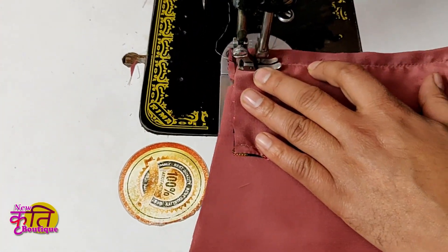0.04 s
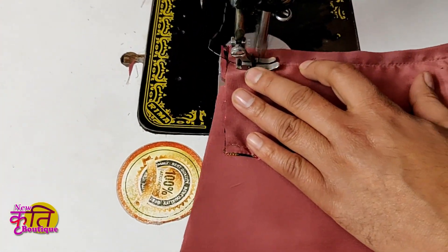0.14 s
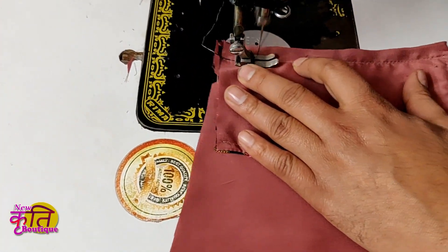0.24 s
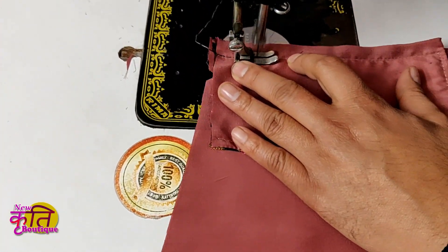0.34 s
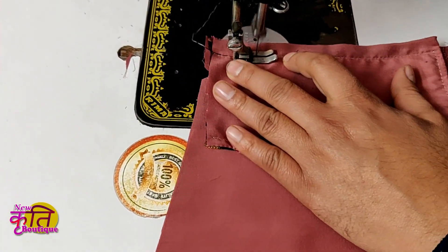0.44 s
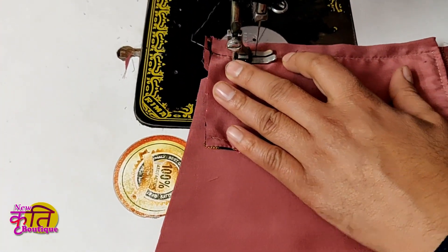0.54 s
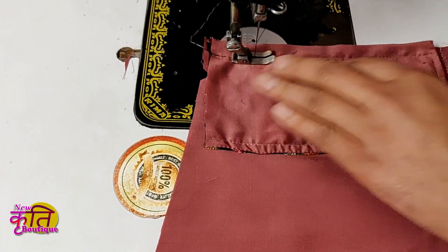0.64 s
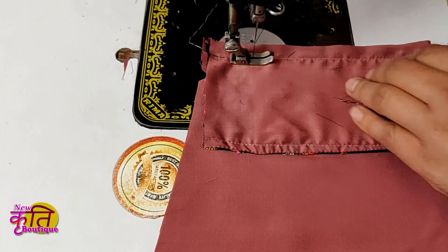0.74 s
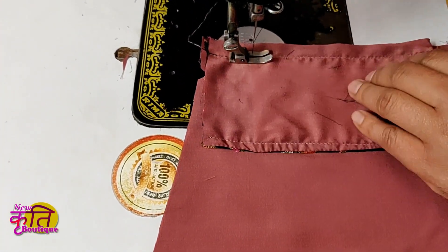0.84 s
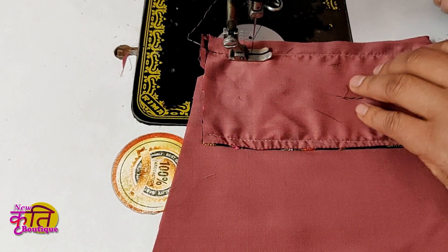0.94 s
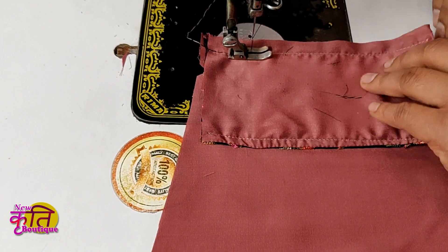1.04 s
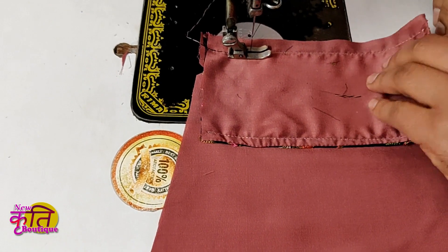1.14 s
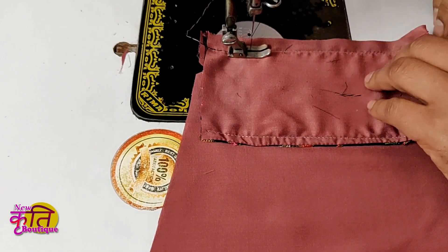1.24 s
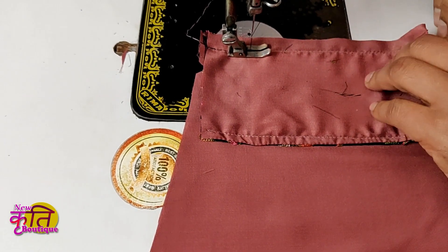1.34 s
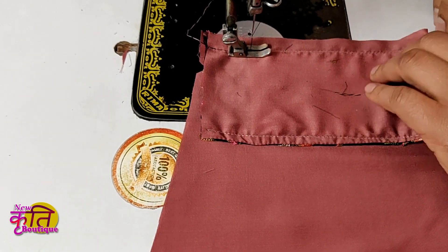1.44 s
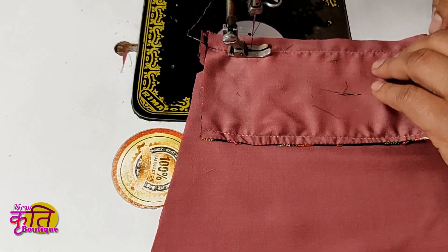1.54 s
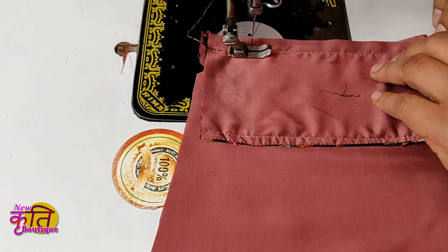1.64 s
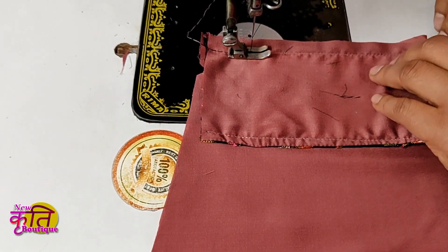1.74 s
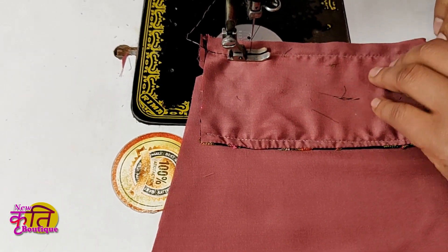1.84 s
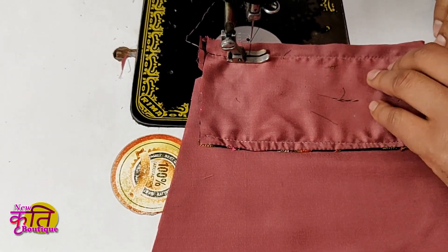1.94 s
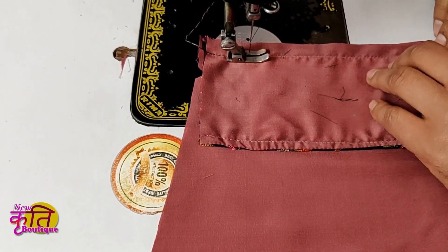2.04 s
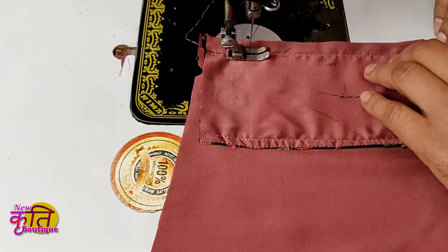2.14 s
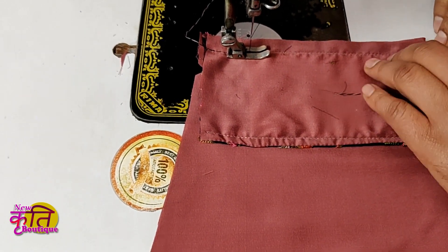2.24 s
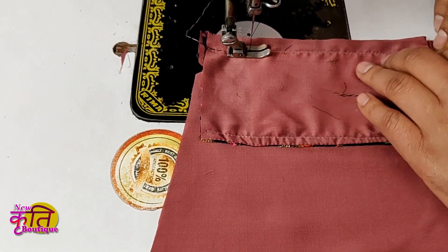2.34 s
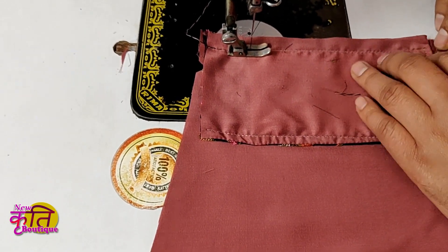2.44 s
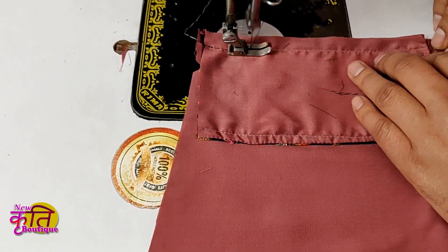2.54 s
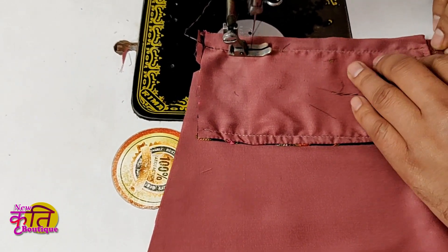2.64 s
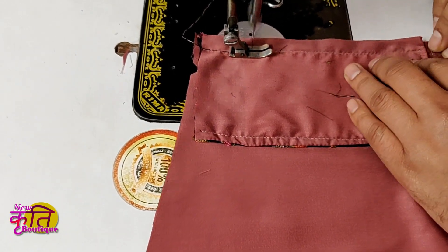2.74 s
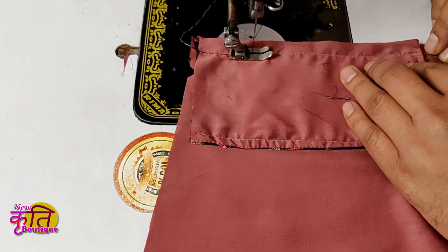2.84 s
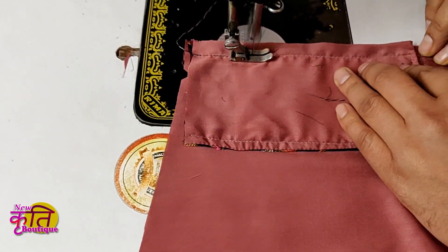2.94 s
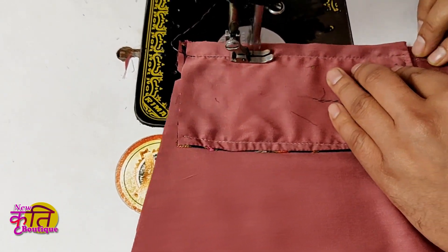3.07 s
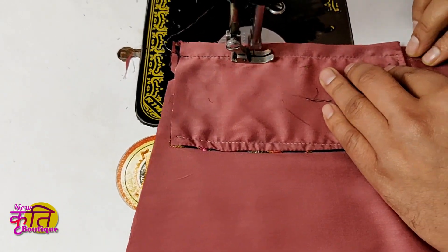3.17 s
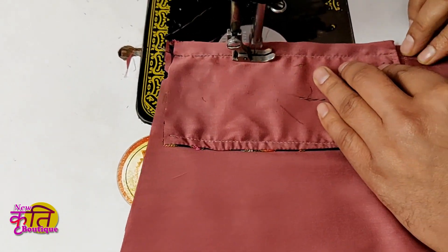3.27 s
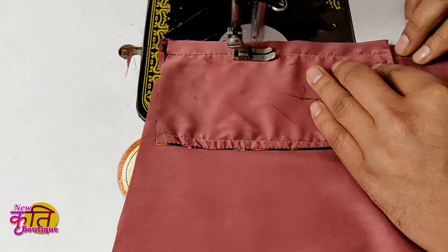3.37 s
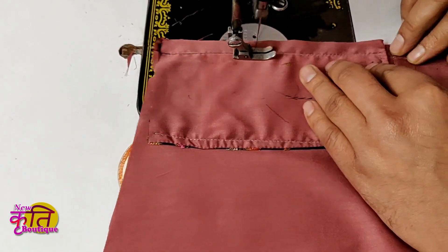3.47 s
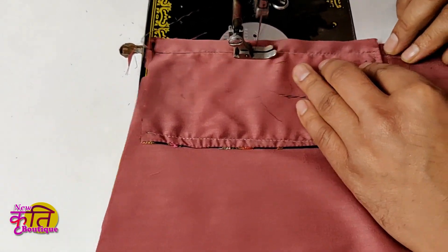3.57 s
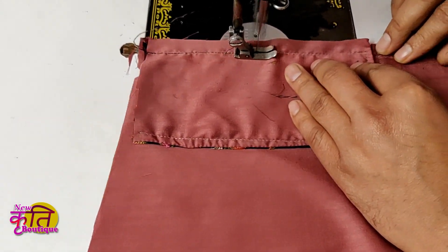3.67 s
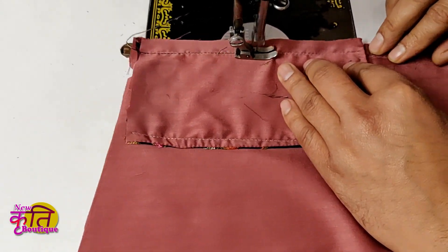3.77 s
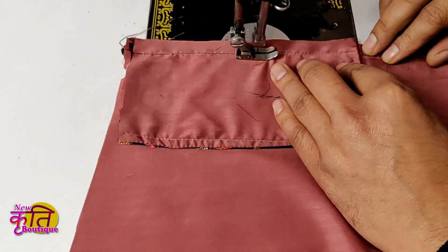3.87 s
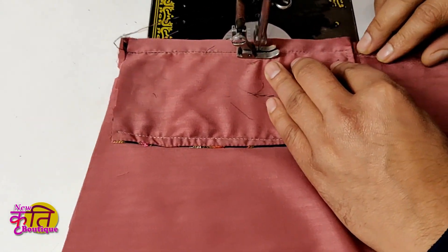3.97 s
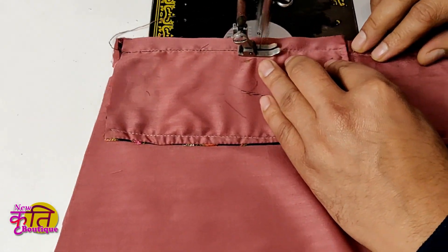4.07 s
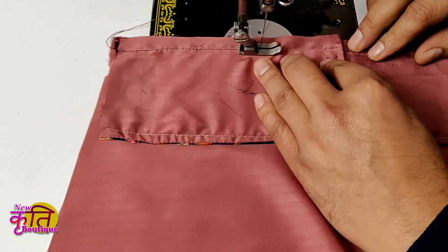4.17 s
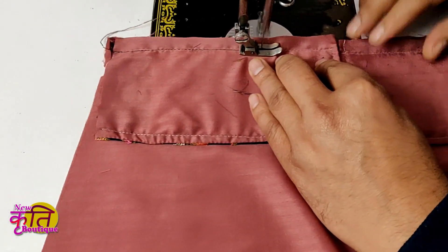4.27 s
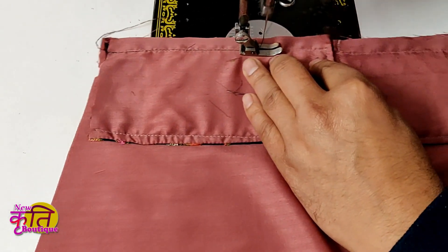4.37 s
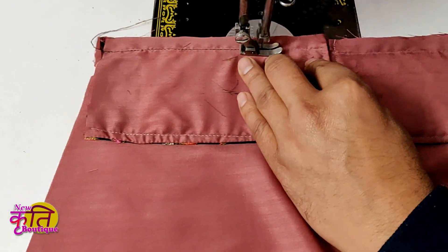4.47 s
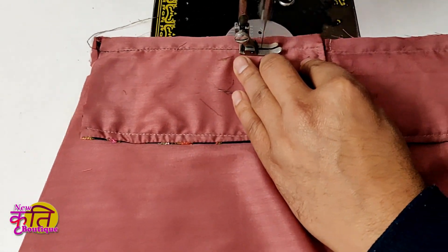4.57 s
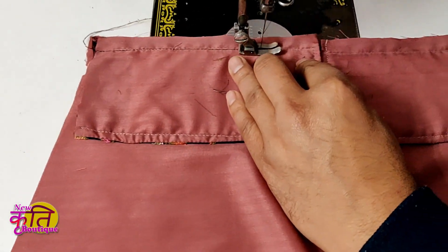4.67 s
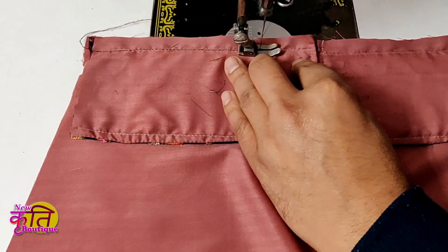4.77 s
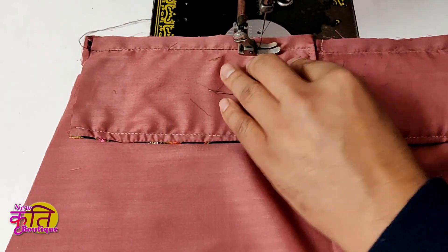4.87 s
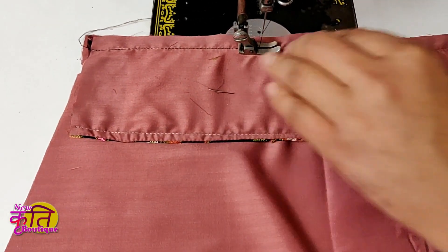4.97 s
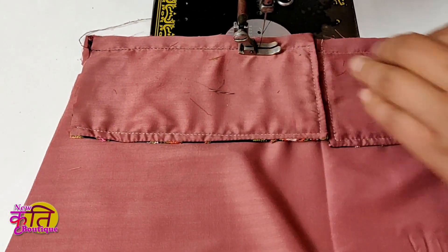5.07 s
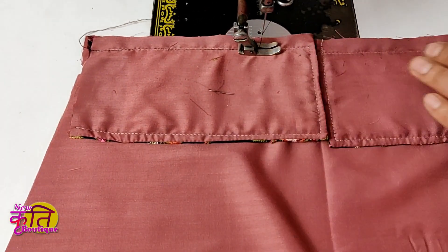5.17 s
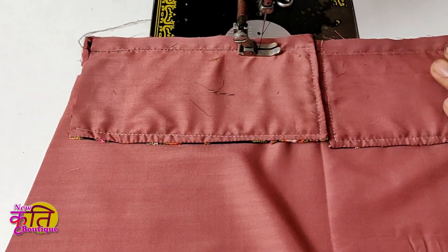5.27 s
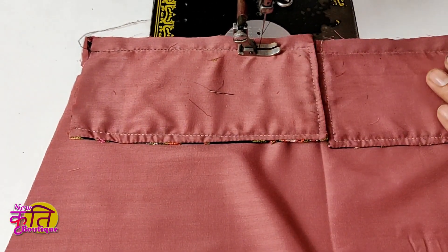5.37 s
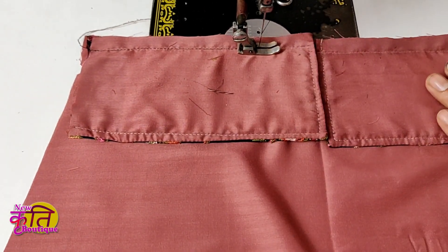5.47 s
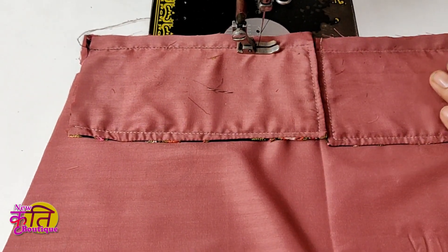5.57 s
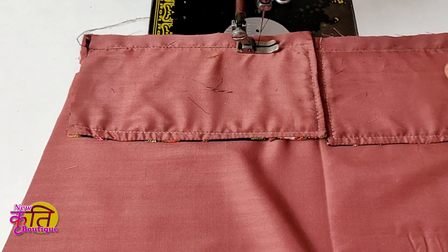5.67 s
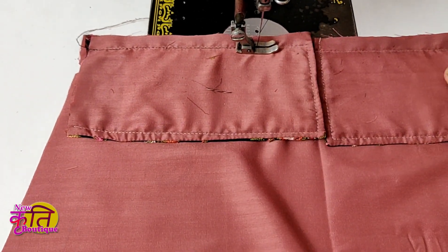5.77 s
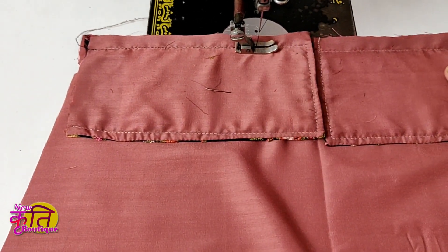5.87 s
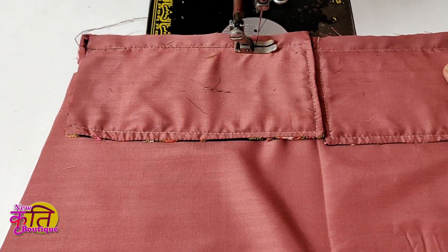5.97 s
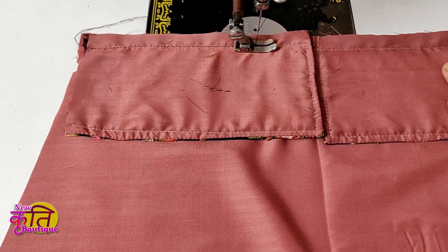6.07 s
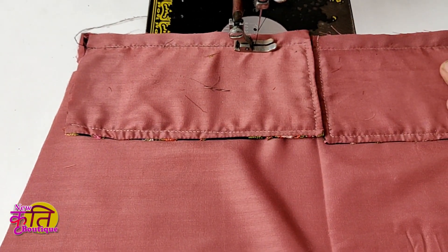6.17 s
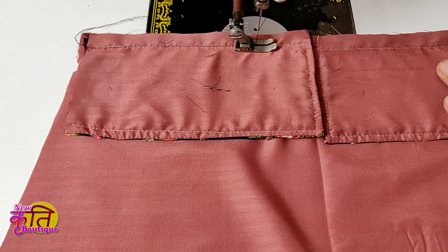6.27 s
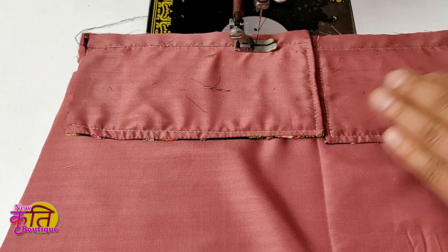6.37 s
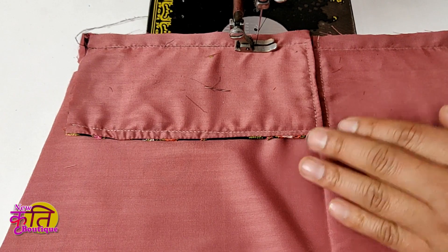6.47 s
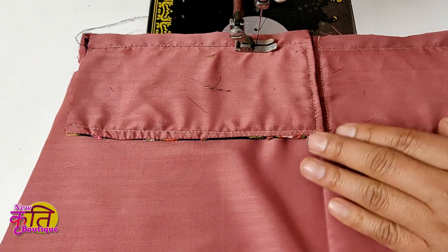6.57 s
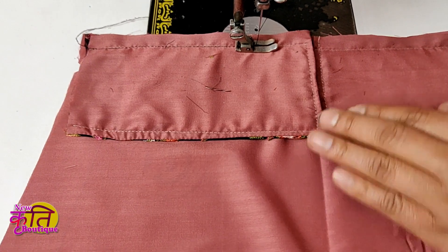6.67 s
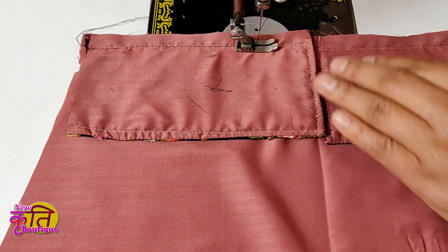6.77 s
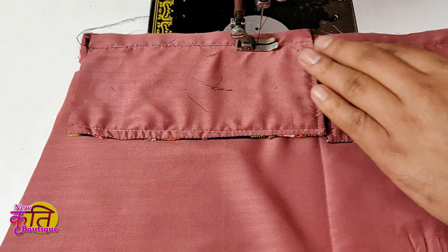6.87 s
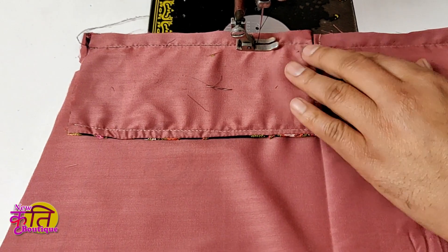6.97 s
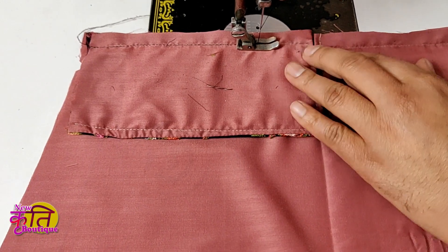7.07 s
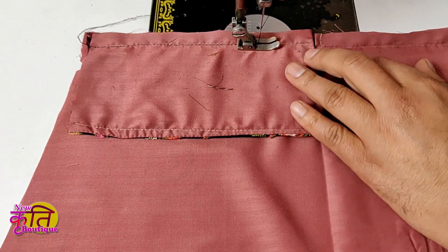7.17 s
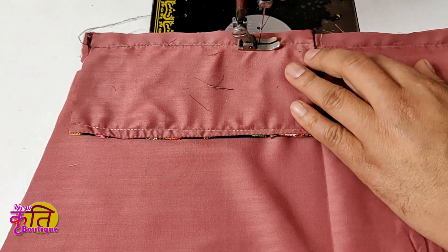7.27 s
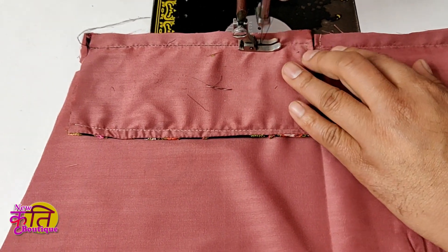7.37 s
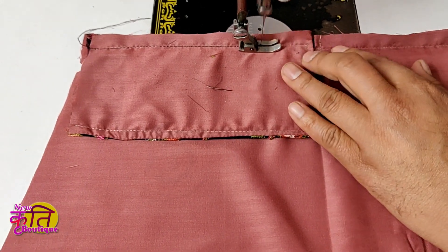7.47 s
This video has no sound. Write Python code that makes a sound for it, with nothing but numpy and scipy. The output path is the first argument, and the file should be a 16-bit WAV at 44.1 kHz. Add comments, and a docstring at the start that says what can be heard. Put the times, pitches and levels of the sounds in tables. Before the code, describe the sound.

Close up, a motor-driven sewing machine stitches cloth in three clattering bursts, its belt squealing on restarts, over a faint hum.

```python
"""A room with a throbbing hum, close to a table: a cast-iron sewing machine sews a seam in three short runs.
Each shaft turn knocks the table, rattles the linkage and drives the needle through the cloth. On the later two
starts the loaded motor buzzes and a high squeal rises. Under strain the machine groans, dry joints chirp and
steel parts clink."""
import sys
import numpy as np
from scipy import signal
from scipy.fft import rfft, irfft, next_fast_len
from scipy.io import wavfile
from scipy.ndimage import uniform_filter1d, minimum_filter1d, map_coordinates

SR = 44100
rng = np.random.default_rng(int(sys.argv[2]) if len(sys.argv) > 2 else 0)


def unload_wav(signal):
    """Save mono or channel-first audio to the path in sys.argv[1] as 16-bit WAV at rate SR, clipped to [-1, 1]."""
    wavfile.write(
        sys.argv[1],
        SR,
        np.round(np.clip(np.atleast_2d(signal).T, -1, 1) * 32767).astype(np.int16),
    )


N = 331191
T = np.arange(N) / SR

# Diffuse sound field. Each row: frequency in Hz, left-right correlation.
COHERENCE = [(100, 0.89), (300, 0.79), (600, 0.56), (1200, -0.36), (3000, 0.066), (6000, -0.25),
             (15000, 0.049)]
# Low hum lines. Each row: frequency in Hz, relative level in dB.
HUM_LOW = [(43.1, -24), (86, -27), (94, -15.5), (111, -7), (128, -6), (145, -1.5), (157, -2), (174, -10)]
# Envelope of the low hum. Each row: time in seconds, level in dB.
HUM_LOW_ENVELOPE = [(.5, -35.5), (1.0, -37.5), (1.6, -41.5), (1.9, -38.5), (2.2, -42), (4.9, -45.5),
                    (5.4, -46), (6.2, -44), (6.7, -49), (7.1, -50)]
# Upper hum lines. Each row: frequency in Hz, level in dB.
HUM_HIGH = [(201, -51), (210.4, -43.5), (224, -47), (236, -54), (274, -64)]
# Room noise. Each row: frequency in Hz, relative density in dB.
AIR_SPECTRUM = [(25, -12), (60, -15.5), (100, 6), (185, 4), (255, 7.5), (290, 3.5), (350, -7.5), (500, -14),
                (750, -11), (1050, -18), (1600, -23), (3000, -31), (7000, -35), (16000, -41.5)]
# Envelope of the room noise. Each row: time in seconds, level in dB.
AIR_ENVELOPE = [(.5, -41.5), (1.2, -45), (2.2, -45), (5.0, -46.5), (5.7, -48.5), (7.1, -47)]
# Room resonances. Each row: frequency in Hz, bandwidth in Hz, relative gain in dB.
AIR_MODES = [(370, 14, -3), (645, 18, -7), (900, 19, 2), (1053, 14, -9), (1173, 30, -7), (1320, 20, -7)]

# Cloth shifted by hand. Each row: centre in seconds, half length in seconds, gain in dB.
RUSTLES = [(1.02, 0.083, -67), (1.782, 0.092, -67), (2.046, 0.043, -62), (2.284, 0.032, -50),
           (5.064, 0.055, -63), (5.3, 0.2, -67), (6.045, 0.043, -64), (7.114, 0.1, -60)]
# Faint creaks. Each row: start and length in seconds, first and last pitch in Hz, level in dB.
CREAKS = [(1.92, 0.27, 1350, 1330, -65), (6.58, 0.11, 690, 720, -58), (6.79, 0.13, 1260, 1310, -63),
          (6.82, 0.15, 846, 820, -55.5), (6.93, 0.094, 496, 490, -47.5)]
# Metal clicks in the pauses. Each row: time in seconds, gain in dB, relative ring gain in dB.
CLICKS = [(.823, -49.5, -10), (5.438, -46, -3.5)]
# Snap of a click. Each row: frequency in Hz, relative density in dB.
CLICK_SPECTRUM = [(300, -45), (800, 12.5), (1500, -3), (2600, 2), (4000, -6.5), (7000, -5), (8800, -13),
                  (10000, -23), (15000, -25)]
# Ring of a click. Each row: frequency in Hz, relative level in dB, T60 in seconds.
CLICK_MODES = [(790, 4, 0.5), (836, 7.5, 0.4), (1141, -3, 0.55), (1260, -2, .2), (2120, 0, 0.21),
               (2918, -8, .19), (6740, -2, .15)]

# Squeals on starting. Each row: start and length in seconds, first and last pitch in Hz, gain in dB.
SQUEALS = [(2.36, 0.11, 995, 985, -33), (2.485, .135, 2660, 3110, -36.5), (7.3, .17, 2580, 3120, -36.5),
           (7.435, .055, 1005, 975, -31)]
# Motor under starting load. Each row: start and end in seconds, gain in dB.
MOTOR_LOADS = [(2.33, 2.899, -30), (7.164, 7.5, -33)]
# Motor buzz. Each row: multiple of the mains frequency, relative level in dB.
MAINS_ORDERS = [(2, -2.5), (3, -0.5), (6, -10), (9, -3.5)]
# Small parts shaken by the motor. Each row: frequency in Hz, relative density in dB.
SIZZLE_SPECTRUM = [(2000, -25), (5000, 0), (7500, 10), (10500, -13), (13000, -12.5), (15000, -5)]
# Groans under load or braking. Each row: start and length in seconds, first and last pitch in Hz,
# gain in dB.
GROANS = [(.27, 0.11, 359, 320, -38), (2.52, .14, 325, 334, -28), (2.79, 0.19, 293, 288.7, -21),
          (4.28, 0.48, 309, 285.5, -30), (4.44, 0.29, 1029, 916, -40.5), (4.6, 0.19, 362, 343, -32),
          (7.44, 0.058, 439.4, 455, -27)]
# Dry joint chirps. Each row: time in seconds, pitch in Hz, gain in dB.
CHIRPS = [(.15, 7600, -31), (.182, 8350, -30.5), (2.588, 6180, -30.5), (2.719, 7850, -36),
          (2.798, 8130, -28), (2.832, 8200, -30), (2.869, 8130, -31), (2.901, 8400, -37.5),
          (2.929, 8300, -27), (2.964, 8250, -31.5), (3.018, 8100, -33), (3.457, 2800, -24)]
# Steel clinks on slowing. Each row: time in seconds, pitch in Hz, level in dB, T60 in seconds,
# roughness from 0 to 1.
CLINKS = [(.4605, 4420, -45, .16, .5), (.4605, 4800, -48, .1, .9), (4.245, 2020, -33, .15, .12),
          (4.322, 2030, -28, .14, .12), (4.47, 1385, -33, .25, .15), (4.53, 1350, -35, .28, .15),
          (4.783, 1992, -57.5, .42, .14)]
# Machine rocking on the table. Each row: time in seconds, peak in dB.
THUMPS = [(.043, -4.5), (2.323, -20.5), (3.012, -11), (3.027, -9.5), (3.077, -6), (3.289, -13), (4.15, -13),
          (4.22, -21), (4.666, -27), (7.163, -25), (7.2, -24), (7.452, -18)]

# Shaft speed, one list per run, one stitch per turn. Each row: time in seconds, turns per second.
RUNS = [
    [(0, 18.73), (.14, 17.12), (.33, 12.44), (.39, 5), (.53, 0)],
    [(2.292, 0), (2.325, 6.78), (2.55, 6.47), (2.75, 12.22), (3.06, 20), (3.22, 17.3), (3.58, 22.14),
     (3.85, 19.92), (4.02, 17.35), (4.3, 14.78), (4.65, 10.14), (4.72, 3), (4.88, 0)],
    [(7.138, 0), (7.175, 6.6), (7.38, 7.8), (7.51, 10)],
]
# Shaft travel before the needle first strikes. Each entry: turns, for one run.
FIRST_STROKE_TURNS = [.242, .083, .03]
# Loudness against speed. Each row: turns per second, then knock, clatter and sliding gains in dB.
SPEED_GAINS = [(0, -50, -59.5, -81), (2.6, -36.5, -43.5, -49.5), (6.44, -36, -34, -43),
               (11.3, -26, -29, -35), (15.4, -24, -27, -33), (16.7, -20.5, -25.5, -32.5),
               (23.15, -15, -22.5, -30.5)]
# Effort within a stitch. Each row: angle in turns, then knock, clatter and sliding gains in dB.
TURN_EFFORT = [(0, -.5, 0, 0), (.14, 0, -.5, .5), (.23, -4.5, 0, .7), (.4, -1, .7, -.5), (.49, 3.5, .3, 0),
               (.57, .3, -1.5, -.5), (.67, 1, -3, -1.2), (.75, 0, -1, .7), (.83, .7, 2.2, .5),
               (.92, -1.2, 0, -.7)]
# Needle bar, take-up lever, shuttle, feed dog. Each row: angle in turns, relative level in dB.
CONTACTS = [(.02, -0.5), (.44, 4.5), (.62, 1), (.79, 2)]
# Regular ticks, the needle's first. Each row: angle in turns, strength in dB over the sliding gain.
TURN_TICKS = [(0, 9.5), (.22, 0), (0.499, 0), (0.729, -2)]
# Clacks on taking hold, piercing thick cloth or stopping. Each row: time in seconds, strength in dB.
CLACKS = [(0.0178, -13.5), (0.068, -15.5), (.249, -15.5), (0.324, -19.5), (0.392, -20), (0.46, -36),
          (2.25, -45), (2.297, -32), (2.3202, -22), (2.3347, -35), (2.47, -23), (2.6187, -15), (2.716, -17),
          (2.797, -16.5), (2.868, -17.5), (2.9267, -18), (2.9903, -15), (3.0435, -15), (3.09, -15),
          (3.1442, -14), (3.4642, -14.5), (3.515, -15.5), (3.56, -14.5), (3.696, -15), (3.9461, -17.5),
          (4.004, -15.5), (4.1212, -16), (4.182, -17), (4.2453, -15.5), (4.311, -17.5), (4.3838, -15),
          (4.42, -22), (4.458, -16.5), (4.517, -21.5), (4.544, -23), (4.6035, -20), (4.631, -14),
          (4.784, -33.5), (7.1356, -38), (7.154, -34), (7.242, -33), (7.43, -24), (7.4614, -21)]
# Crack of a tick. Each row: frequency in Hz, relative density in dB.
TICK_SPECTRUM = [(400, -21), (1200, 1.5), (2500, 1), (5000, -0.5), (8000, 1), (10500, -10.5), (13000, -17),
                 (15500, -3.5)]
# Loose steel parts. Each row: frequency in Hz, gain in dB, T60 in seconds.
LOOSE_MODES = [(1966, -24, 0.2), (4290, -22.5, 0.056), (4720, -30, 0.069), (8100, -24, 0.016)]
# Table and machine bed. Each row: frequency in Hz, bandwidth in Hz, gain in dB.
TABLE_MODES = [(35.6, 102, -18.5), (94.6, 7.2, 2.5), (137, 15, 4.5), (171.4, 29.4, 2.5), (214, 75, -3.5),
               (293, 32.5, 6), (355, 22.2, 1.5), (443, 59, -11.5)]
# Shaft harmonics driving the table. Each row: multiple of the shaft rate, relative drive in dB.
BOOM_ORDERS = [(8, -2.5), (9, -5.5), (16, -11.5), (20, -11.5)]
# Drive let off. Each row: start and end in seconds.
COASTS = [(.29, .6), (4.32, 5.0)]
# Cast-iron arm and cover plates. Each row: frequency in Hz, bandwidth in Hz, gain in dB.
ARM_MODES = [(444, 82, 3), (574.6, 44, 10.5), (684, 180, -1), (875, 12, 9), (906, 71, 2), (1060, 110, -9.5),
             (1360, 22, -5), (1997, 290, -7)]
# Linkage clatter. Each row: frequency in Hz, relative density in dB.
CLATTER_SPECTRUM = [(200, -21), (350, 2), (500, 1.5), (800, -4), (1150, -3.5), (1600, -13), (2100, -15),
                    (3000, -17.5), (6000, -39)]
# Shaft harmonics driving the arm. Each row: multiple of the shaft rate, relative drive in dB.
WHINE_ORDERS = [(32, -9.5), (35, -11.5), (41, -8), (42, -7)]
# Arm resonances that whine. Each row: frequency in Hz, bandwidth in Hz, gain in dB.
WHINE_MODES = [(570, 140, -6.5), (698, 36, 0.5), (903, 71, 1)]
# Buzzing cover plate. Each row: frequency in Hz, bandwidth in Hz, relative gain in dB.
PLATE_MODES = [(863, 54, 0)]
# Sliding steel. Each row: frequency in Hz, relative density in dB.
STEEL_SPECTRUM = [(900, -21), (1800, 0.5), (2550, 6.5), (3150, 1.5), (3700, 1), (4300, 3), (4900, -0.5),
                  (5400, -3), (6400, 4.5), (7200, 0), (8400, -3.5), (9500, -13.5), (9950, -5), (10600, -22),
                  (12300, -9.5), (13500, -13), (14800, -10.5), (15700, -8.5)]
# Small steel parts. Each row: frequency in Hz, bandwidth in Hz, relative gain in dB.
STEEL_MODES = [(1348, 68, 13.5), (1590, 59, 2.5), (1910, 93, 5.5), (2014, 35, 4.5), (2560, 160, -9.5),
               (2760, 27, 5), (3770, 150, -3.5), (4420, 25, -1), (4850, 130, -1.5)]
# Stereo balance of the machine. Each row: frequency in Hz, left minus right in dB.
BALANCE = [(100, 1), (350, -0.5), (700, 0.5), (1300, 1), (1900, 3), (2600, -3.5), (3600, 0), (5000, 3.5),
           (6300, 7), (7400, 1), (8500, -5), (10500, -2.5), (12300, -1.5), (15000, -0.5)]


def from_db(db):
    """Decibels to gain."""
    return 10 ** (np.asarray(db) / 20)


def rms_one(x):
    """Scale to rms 1."""
    return x / np.sqrt(np.mean(x ** 2) + 1e-20)


def evened(x, window_s):
    """Hold the running rms near 1, keeping faster detail."""
    power = np.mean(np.atleast_2d(x) ** 2, axis=0)
    size = int(window_s * SR)
    running = uniform_filter1d(uniform_filter1d(power, size), size)
    return x / np.sqrt(np.abs(running) + 1e-4 * power.mean())


def envelope(rows):
    """Gain per sample from (seconds, dB) points."""
    return from_db(np.interp(T, *np.transpose(rows)))


def at_hz(points, hz):
    """Interpolate on a log-frequency axis."""
    knots_hz, values = np.transpose(points)
    return np.interp(np.log(hz + 1), np.log(knots_hz), values)


def drift(rate_hz):
    """Smooth random curve, rms 1."""
    knots = rng.standard_normal(int(N / SR * rate_hz) + 3)
    return rms_one(map_coordinates(knots, [T[::20] * rate_hz], order=2, mode="nearest")).repeat(20)[:N]


def colour(x, spectrum, size=4096):
    """Minimum-phase filter of unit energy."""
    cepstrum = irfft(np.log(from_db(at_hz(spectrum, np.fft.rfftfreq(size, 1 / SR)))))
    cepstrum[1:size // 2] *= 2
    cepstrum[size // 2 + 1:] = 0
    response = irfft(np.exp(rfft(cepstrum)))
    return signal.oaconvolve(np.atleast_2d(x), response[None] / np.linalg.norm(response), axes=1)[:, :N]


def resonate(x, modes):
    """Parallel resonators of alternating sign."""
    out = 0
    for k, (hz, width_hz, db) in enumerate(modes):
        radius = np.exp(-np.pi * width_hz / SR)
        gain = (-1) ** k * from_db(db) * (1 - radius ** 2) / 2
        feedback = [1, -2 * radius * np.cos(2 * np.pi * hz / SR), radius ** 2]
        out = out + signal.lfilter([gain, 0, -gain], feedback, x + 1e-18)
    return out


def ring_out(strikes, modes):
    """Each strike starts a set of decaying sines."""
    t = T[:SR // 2]
    tone = sum(from_db(db - 60 * t / t60_s) * np.sin(2 * np.pi * hz * t) for hz, db, t60_s in modes)
    return signal.oaconvolve(strikes, tone)[:N]


def impulses(times_s, sizes):
    """One-sample pulses at the given times."""
    return np.bincount(np.clip(np.round(times_s * SR).astype(int), 0, N - 1), sizes, N)


def grains(per_s, spread_db):
    """Random tiny contacts of uneven size."""
    sizes = from_db(spread_db * np.minimum(rng.exponential(1, N), 4))
    return (rng.random(N) < per_s / SR) * sizes * rng.choice([-1, 1], N)


def decay(x, t60_s):
    """Give each pulse an exponential tail."""
    return signal.lfilter([1], [1, -from_db(-60 / (t60_s * SR))], x + 1e-18)


def glides(rows, roughness):
    """Rough tones that swell, slide in pitch and fade."""
    out, waver = 0, 1 + roughness * drift(700)
    for start_s, length_s, first_hz, last_hz, db in rows:
        progress = np.clip((T - start_s) / length_s, 0, 1)
        hz = (first_hz + (last_hz - first_hz) * progress) * waver
        out = out + from_db(db) * np.sin(np.pi * progress) * np.sin(2 * np.pi * np.cumsum(hz) / SR)
    return out


def diffuse():
    """Stereo noise: alike in the bass, nearly unrelated in the treble."""
    coherence = np.clip(at_hz(COHERENCE, np.fft.rfftfreq(N, 1 / SR)), -1, 1)
    mid, side = rfft(rng.standard_normal((2, N)))
    return irfft(np.sqrt(1 + coherence) * mid + np.sqrt(1 - coherence) * side * [[1], [-1]], N)


def scattered(hits, t60_s, rise_s=.001):
    """Each contact sets off its own stereo spray of reflections."""
    power = decay(hits ** 2, t60_s / 2) * (1 - from_db(-120 / (t60_s * SR)))
    return np.sqrt(np.abs(uniform_filter1d(power, int(rise_s * SR) + 1))) * rms_one(diffuse())


def room(hits, direct_db, near_db, far_db, near_t60_s=0.15, far_t60_s=0.39):
    """Direct sound, quick reflections off bed and table, longer ones off the walls."""
    near = from_db(near_db) * scattered(hits, near_t60_s)
    far = from_db(far_db) * scattered(hits, far_t60_s)
    return from_db(direct_db) * hits + near + far


def hum_line(hz, waver_hz, flutter_db):
    """A sine wandering in pitch and level."""
    phase = 2 * np.pi * (np.cumsum(hz + waver_hz * drift(5)) / SR + rng.random())
    return np.sqrt(2) * np.sin(phase) * from_db(flutter_db * drift(3.87))


def background():
    """Close hum lines beat over dull room noise."""
    low = rms_one(sum(from_db(db) * hum_line(hz, waver_hz=1.164, flutter_db=4.5) for hz, db in HUM_LOW))
    high = sum(from_db(db) * hum_line(hz, waver_hz=0.31, flutter_db=1.6) for hz, db in HUM_HIGH)
    air = envelope(AIR_ENVELOPE) * rms_one(colour(diffuse(), AIR_SPECTRUM))
    ring = from_db(-68) * rms_one(resonate(diffuse(), AIR_MODES))
    return envelope(HUM_LOW_ENVELOPE) * low + high + ring + air


def cloth():
    """Fabric swishes softly under the hand."""
    swell = sum(from_db(db) * np.exp(-((T - centre_s) / half_s) ** 2) for centre_s, half_s, db in RUSTLES)
    return swell * colour(diffuse(), [(300, -4), (900, 9.0), (2500, -3.5), (7000, -12.5), (15000, -37)])


def creaks():
    """Faint rough tones in the pauses."""
    return glides(CREAKS, roughness=0.08)


def clicks():
    """A small metal part snaps over, chatters and rings."""
    times_s, db, ring_db = np.transpose(CLICKS)
    chatter = decay(impulses(times_s, from_db(db)), t60_s=0.11) * rms_one(grains(4000, spread_db=1.5))
    snap = room(chatter, direct_db=-26, near_db=3.5, far_db=4.5, near_t60_s=0.023)
    ring = ring_out(impulses(times_s, from_db(db + ring_db)), CLICK_MODES)
    return colour(snap, CLICK_SPECTRUM) + from_db(-6) * ring


def squeals(pulse_hz=50.47, rasp_db=-11):
    """A rough squeal rasps and rises, pulsing about fifty times a second."""
    slip = sum(from_db(db) * np.sin(np.pi * np.clip((T - start_s) / length_s, 0, 1))
               for start_s, length_s, _, _, db in SQUEALS)
    rasp = from_db(rasp_db) * slip * rms_one(colour(diffuse(), STEEL_SPECTRUM))
    pulse = 1 + 0.65 * np.sin(2 * np.pi * pulse_hz * T)
    return (glides(SQUEALS, roughness=0.04) + rasp) * pulse * from_db(2 * drift(300))


def motor(mains_hz=49.8, shake_rad=.09, sizzle_db=-11):
    """The loaded motor buzzes on mains harmonics and makes small parts sizzle."""
    load = sum(from_db(db) * ((T > on_s) & (T < off_s)) for on_s, off_s, db in MOTOR_LOADS)
    phase = 2 * np.pi * np.cumsum(mains_hz + .5 * drift(11)) / SR
    buzz = sum(from_db(db + 2 * drift(25)) * np.sin(order * (phase + shake_rad * drift(70)))
               for order, db in MAINS_ORDERS)
    sizzle = rms_one(colour(scattered(grains(500, spread_db=1.5), t60_s=0.032), SIZZLE_SPECTRUM))
    return uniform_filter1d(load, SR // 30) * (buzz + from_db(sizzle_db) * sizzle)


def run_hz(run):
    """Turns per second in one run, zero outside it."""
    return np.interp(T, *np.transpose(run), left=0, right=0)


def shaft_hz():
    """Turns per second over all runs."""
    return sum(run_hz(run) for run in RUNS)


def shaft_rad():
    """Accumulated shaft angle."""
    return 2 * np.pi * np.cumsum(shaft_hz()) / SR


def run_gains(load_db=1.8, knee_hz_per_s=62):
    """Knock, clatter and sliding gains: up with speed and acceleration, zero at rest."""
    speed_hz = shaft_hz()
    load = np.tanh(uniform_filter1d(np.gradient(speed_hz) * SR, SR // 20) / knee_hz_per_s)
    knots_hz, *layers_db = np.transpose(SPEED_GAINS)
    return [(speed_hz > 0) * from_db(np.interp(speed_hz, knots_hz, db) + load_db * load)
            for db in layers_db]


def turn_effort():
    """Swell of knock, clatter and sliding within each turn."""
    turns = sum((run_hz(run) > 0) * (np.cumsum(run_hz(run)) / SR - first)
                for run, first in zip(RUNS, FIRST_STROKE_TURNS))
    angles, *layers_db = np.transpose(TURN_EFFORT)
    return [from_db(np.interp(turns, angles, db, period=1)) for db in layers_db]


def each_turn(angles_turns, levels_db, jitter_s, uneven_db):
    """Contacts recur at set shaft angles, never quite alike."""
    out = 0
    for run, first in zip(RUNS, FIRST_STROKE_TURNS):
        turns = np.cumsum(run_hz(run)) / SR
        hit_turns = first + np.arange(-1, turns[-1])[:, None] + np.asarray(angles_turns)
        times_s = np.interp(hit_turns, turns, T) + jitter_s * rng.standard_normal(hit_turns.shape)
        sizes = from_db(np.asarray(levels_db) + uneven_db * rng.standard_normal(hit_turns.shape))
        signed = sizes * (-1) ** np.arange(len(angles_turns))
        reached = (hit_turns > 0) & (hit_turns < turns[-1])
        out = out + impulses(times_s[reached], signed[reached])
    return out


def groans(throb_depth=0.59):
    """The straining machine groans, throbbing twice per turn."""
    return glides(GROANS, roughness=0.0089) * (1 + throb_depth * np.sin(2 * shaft_rad()))


def chirps(length_s=0.0055):
    """A dry joint squeaks, stronger on the right."""
    rows = [(time_s - length_s / 2, length_s, hz, hz, db) for time_s, hz, db in CHIRPS]
    return glides(rows, roughness=0.022) * from_db([[-4], [2]])


def clinks():
    """Each struck steel part rings on one tone, roughened by chatter."""
    out, chatter = 0, drift(900)
    for time_s, hz, db, t60_s, roughness in CLINKS:
        tail = decay(impulses(np.array([time_s]), from_db([db])), t60_s)
        out = out + tail * np.sin(2 * np.pi * (hz * T + roughness * chatter / 2))
    return out


def thumps():
    """The machine rocks; each blow rings all the table's modes."""
    blow = resonate(impulses(np.zeros(1), np.ones(1)), TABLE_MODES)[:SR // 2]
    times_s, db = np.transpose(THUMPS)
    return signal.oaconvolve(impulses(times_s, from_db(db)), blow / np.abs(blow).max())[:N]


def boom(knock_gain, lag_s=.11):
    """Shaft harmonics sweep the heavy table's modes, lagging the speed."""
    speed_hz = np.interp(T - lag_s, T, shaft_hz())
    gain = np.interp(T - lag_s, T, knock_gain)
    phase = 2 * np.pi * np.cumsum(speed_hz) / SR
    drone = sum(from_db(db + 4.1 * drift(22.02)) * np.sin(order * phase + 0.54 * drift(18))
                for order, db in BOOM_ORDERS)
    return resonate(gain * speed_hz / speed_hz.max() * drone, TABLE_MODES)


def coasting(table, bass_db=-7.5, below_hz=189):
    """With the drive off, the table's bass drops."""
    drive_off = uniform_filter1d(sum(1. * ((T > start) & (T < end)) for start, end in COASTS), SR // 25)
    bass = signal.sosfiltfilt(signal.butter(3, below_hz, fs=SR, output="sos"), table)
    return table + (from_db(bass_db * drive_off) - 1) * bass


def table_knock(blows, joints, rolling, gain):
    """Contacts shake the table and bed over the shaft's boom."""
    shake = blows + from_db(-4.5) * joints + from_db(2.5) * rolling
    table = resonate(room(shake, direct_db=3, near_db=-11.5, far_db=-5.5), TABLE_MODES)
    return coasting(gain * evened(table, window_s=0.017) + boom(gain))


def whine(clatter_gain):
    """High shaft harmonics surface where the arm resonates."""
    phase = shaft_rad()
    tones = sum(from_db(db + 3 * drift(30)) * np.sin(order * phase + 1.1 * drift(55))
                for order, db in WHINE_ORDERS)
    return resonate(np.sqrt(2) * clatter_gain * tones, WHINE_MODES)


def plate_buzz(rattle, top_db=-43.5, fall_db_per_hz=7.5):
    """A cover plate shakes loose near top speed."""
    speed_hz = shaft_hz()
    gain = from_db(top_db - fall_db_per_hz * (speed_hz.max() - speed_hz))
    return gain * evened(resonate(rattle, PLATE_MODES), window_s=0.16)


def arm_clatter(rattle, gain):
    """The rattling linkage rings the cast-iron arm."""
    clatter = rms_one(colour(rattle, CLATTER_SPECTRUM))
    ring = from_db(0.5) * rms_one(resonate(rattle, ARM_MODES))
    return from_db(0.92) * gain * evened(clatter + ring, window_s=0.037)


def sliding_steel(joints, gain):
    """Steel scrapes on steel in dense grains; small parts ring."""
    scrape = rms_one(grains(2400, spread_db=-3)) + from_db(-14) * joints
    spray = room(scrape, direct_db=-10.5, near_db=5, far_db=-22, near_t60_s=0.018)
    hiss = rms_one(colour(spray, STEEL_SPECTRUM))
    ring = from_db(-6.5) * rms_one(resonate(spray, STEEL_MODES))
    return from_db(0.4) * gain * evened(hiss + ring, window_s=0.055)


def linkage(joint_count=22):
    """Main contacts, loose joints and rolling grains excite table, arm and steel parts."""
    knock_gain, clatter_gain, slide_gain = run_gains()
    blows = rms_one(each_turn(*np.transpose(CONTACTS), jitter_s=0.00021, uneven_db=3.5))
    joint_turns = (np.arange(joint_count) + rng.random(joint_count)) / joint_count
    joint_db = rng.normal(0, 1.2, joint_count)
    joints = rms_one(each_turn(joint_turns, joint_db, jitter_s=.0001, uneven_db=5.5))
    rolling = rms_one(grains(1500, spread_db=-3.5))
    table = table_knock(blows, joints, rolling, knock_gain)
    shake = from_db(-13) * blows + joints + from_db(-1.5) * rolling
    rattle = room(shake, direct_db=-2.5, near_db=-1.5, far_db=-3, near_t60_s=0.088)
    clatter = arm_clatter(rattle, clatter_gain)
    steel = sliding_steel(joints, slide_gain)
    arm = clatter + whine(clatter_gain) + plate_buzz(rattle)
    knock_swell, clatter_swell, slide_swell = turn_effort()
    return knock_swell * table + clatter_swell * arm + slide_swell * steel


def ticks():
    """Needle strokes and slack joints crack and ring the arm; the strokes also ring loose parts."""
    slide_gain = run_gains()[-1]
    times_s, db = np.transpose(CLACKS)
    clacks = impulses(times_s, from_db(db))
    regular = slide_gain * each_turn(*np.transpose(TURN_TICKS), jitter_s=0.00038, uneven_db=0.5)
    # a clack replaces any regular tick close to it
    strikes = clacks + regular * minimum_filter1d(1. * (clacks == 0), SR // 40)
    slack = from_db(3) * slide_gain * grains(per_s=25, spread_db=0.7)
    crack = room(strikes + slack, direct_db=-28, near_db=13.5, far_db=4, near_t60_s=0.018)
    loose_parts = ring_out(strikes, LOOSE_MODES) * from_db([[-4], [2]])
    return colour(crack, TICK_SPECTRUM) + from_db(2.5) * resonate(crack, ARM_MODES) + loose_parts


def housing(x, ring_db=-5.5, t60_s=.09, above_hz=950):
    """The metal housing rings briefly on dense modes, the same for every stroke."""
    t = T[:SR // 10]
    highpass = signal.butter(2, above_hz, "high", fs=SR, output="sos")
    ring = signal.sosfilt(highpass, rng.standard_normal((2, len(t)))) * from_db(-60 * t / t60_s)
    ring = ring / np.linalg.norm(ring, axis=1, keepdims=True)
    return x + from_db(ring_db) * signal.oaconvolve(x, ring, axes=1)[:, :N]


def sewing_machine():
    """Linkage and needle sound through the housing, leaning left or right by band."""
    size = next_fast_len(N + SR // 10)
    balance_db = at_hz(BALANCE, np.fft.rfftfreq(size, 1 / SR)) * np.array([[.5], [-.5]])
    spectrum = rfft(housing(linkage() + ticks()), size)
    return irfft(spectrum * from_db(balance_db), size)[:, :N]


def scene():
    """Stereo mix of machine, drive, handling and room."""
    sewing = sewing_machine()
    handling = clicks() + cloth() + creaks()
    return sewing + thumps() + groans() + chirps() + clinks() + motor() + squeals() + handling + background()


def record(dry):
    """Steep low-pass."""
    cutoff_hz = 15750
    return signal.sosfilt(signal.ellip(12, .1, 80, cutoff_hz, fs=SR, output="sos"), dry)


dry = scene()
out = record(dry)
unload_wav(out)
```